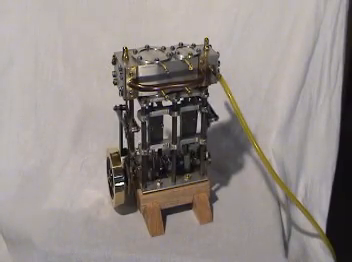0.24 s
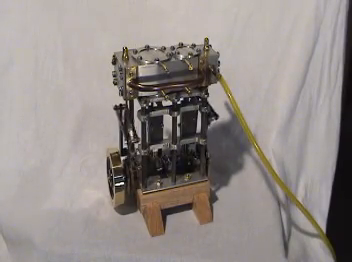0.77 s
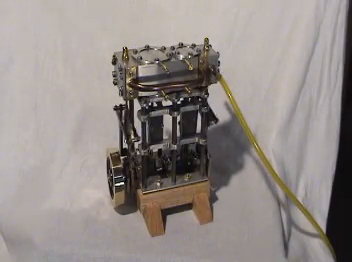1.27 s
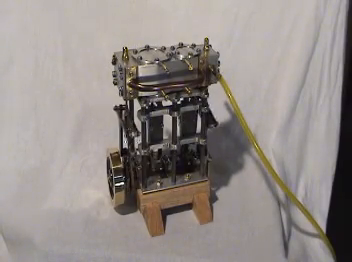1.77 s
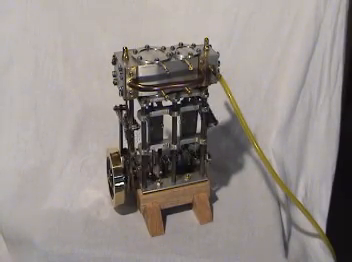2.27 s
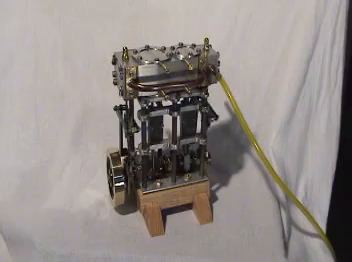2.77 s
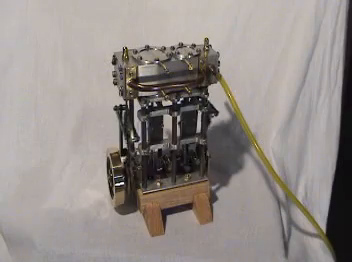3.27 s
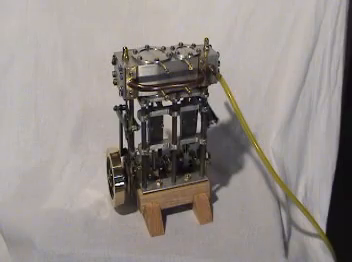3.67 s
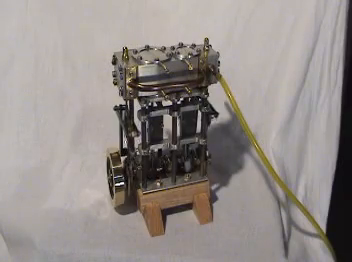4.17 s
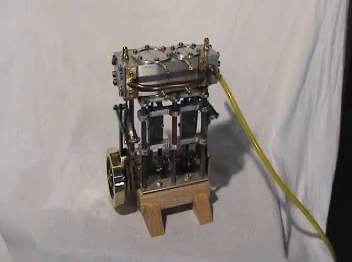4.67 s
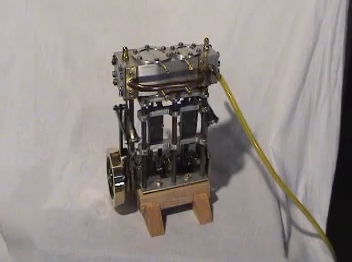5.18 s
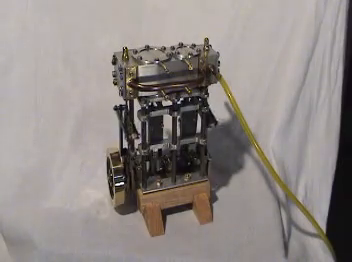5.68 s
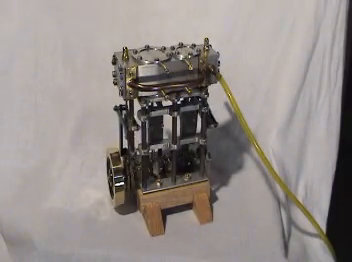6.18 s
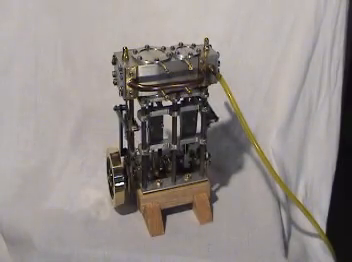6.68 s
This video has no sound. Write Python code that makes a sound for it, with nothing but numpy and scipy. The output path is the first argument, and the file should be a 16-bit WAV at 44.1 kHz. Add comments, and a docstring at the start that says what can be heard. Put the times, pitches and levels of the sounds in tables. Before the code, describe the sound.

Rapid, even mechanical clatter of a tiny twin-cylinder engine on a wooden stand, dry metallic ticks with airy chuffs over faint room hum.

```python
"""A small twin-cylinder model steam engine turns evenly on compressed air, on a wooden plinth on a table. Slack
joints strike brass and steel in the same order every turn, as sums of decaying frame and plinth modes. Rubbing
parts scrape as noise through the frame modes; two exhaust chuffs a turn are noise through port resonances,
gated by the valves. A small room answers with decaying noise tails, over coloured room noise and wavering
sines: a faint motor and mains hum, and a low tone at the thirteenth harmonic of the turning crank."""
import sys
import numpy as np
from scipy import signal
from scipy.fft import rfft, irfft
from scipy.io import wavfile
from scipy.ndimage import uniform_filter1d

SR = 44100
rng = np.random.default_rng(int(sys.argv[2]) if len(sys.argv) > 2 else 0)


def log_audio(samples):
    """Write samples as a 16-bit WAV file to the path given in sys.argv[1]."""
    # one column per channel
    frames = np.atleast_2d(samples).T
    # limit to full scale, then quantise
    limited = np.clip(frames, -1, 1)
    pcm = np.round(limited * 32767).astype(np.int16)
    wavfile.write(sys.argv[1], SR, pcm)


N = 306054
SEC = np.arange(N) / SR


def undb(db):
    """Amplitude ratio of a level in decibels."""
    return 10 ** (np.asarray(db) / 20)


def level(x, db):
    """Normalisation by the root mean square, to a level in dB."""
    return x * undb(db) / np.sqrt(np.mean(x ** 2))


def band(x, hz, width):
    """Second-order resonance with unit gain at its centre."""
    return signal.lfilter(*signal.iirpeak(hz, hz / width, fs=SR), x)


def cut(x, hz, kind, order):
    """Butterworth low-pass or high-pass, maximally flat in its pass band."""
    return signal.sosfilt(signal.butter(order, hz, kind, fs=SR, output="sos"), x)


def ring(hz, t60_ms, db, rise_ms, start_cycles, size, choke=0.98):
    """Modal superposition: sines swell over the contact time and decay; choke over 1 ends them abruptly."""
    ms = np.arange(size)[:, None] * 1000 / SR
    swell = (1 - np.exp(-ms / np.maximum(rise_ms, .02))) ** 2
    fade = np.exp(-np.log(1000) * (ms / t60_ms) ** choke)
    modes = undb(db) * swell * fade * np.sin(2 * np.pi * (hz * ms / 1000 + start_cycles))
    return modes.sum(axis=1)


# The crank passes its mark, the first heavy knock of a turn, at a steady pace.
FIRST_MARK_S, TURN_S, TURN_COUNT = 0.0222, 0.230347, 31
TURN_START_MS = -35  # relative to the mark
# The engine runs a little ahead of or behind that pace.
# Each row: time in seconds, lateness in ms.
PACE_DRIFT = [(0, 0.22), (0.5, 1.23), (1.8, 0.84), (2.2, 0.14), (2.8, -0.034), (3.05, -1.6), (4.15, -1.4),
              (4.4, -0.1), (5.2, -1.1), (6.0, 0.95), (6.9, 0.18)]
STEADY_S = FIRST_MARK_S + TURN_S * np.arange(TURN_COUNT)
MARKS_S = STEADY_S + np.interp(STEADY_S, *np.transpose(PACE_DRIFT)) / 1000


def each_turn(sound, ms, jitter_ms, scatter_db):
    """Near-periodic repetition: one sound at one crank angle, a little uneven in time and strength."""
    pad = SR // 2
    out = np.zeros(N + 2 * pad)
    for mark, (late, hard) in zip(MARKS_S, rng.standard_normal((TURN_COUNT, 2))):
        i = pad + int((mark + (ms + jitter_ms * late) / 1000) * SR)
        out[i:i + len(sound)] += undb(scatter_db * hard) * sound
    return out[pad:pad + N]


def crank_ms():
    """Phase of the rotation, as milliseconds from the mark of the current turn."""
    turn = np.maximum(np.searchsorted(MARKS_S, SEC - TURN_START_MS / 1000) - 1, 0)
    return 1000 * (SEC - MARKS_S[turn])


# Frame modes, one list for each of the six members that a joint can strike.
# Each row: frequency in Hz, 60 dB decay time in ms, relative level in dB.
FRAME_MODES = [
    [(849, 7.03, 0.5), (1808, 19.4, -11.5)],
    [(2274, 9.94, 0), (2748, 6.84, 0.5), (4082, 6.2, -2)],
    [(3205, 6.8, 0.5), (3694, 5.4, 3.5), (10300, 11.5, -12.5)],
    [(1616, 8.45, -5), (4883, 6.04, 2), (8000, 9.7, -8.5), (8790, 12, -14)],
    [(5350, 7.7, 1.5), (6374, 12.7, -4.5), (9460, 6.3, -3.5), (11070, 15, -18)],
    [(1284, 2.55, -17), (5860, 6, 1.5), (6990, 12.4, -2.5), (7580, 11, -4)],
]
# Modes of the plinth and table.
# Each row: frequency in Hz, 60 dB decay time in ms, relative level in dB.
PLINTH_MODES = [(150.5, 220, -14.5), (154, 155, -3.5), (175.5, 100, -7.5), (196.4, 153, -6.5),
                (224.4, 129, -5.5), (265.6, 79, -3), (330, 73, -7.5), (357, 51, -16), (428, 52, -6.5),
                (615, 21, -1.5)]
# Knocks of one turn.
# Each row: time after the mark in ms, rise at 3 kHz in ms, plinth thump in dB, thump centre in Hz,
# then the blow to each of the six members in dB.
KNOCKS = [(-30.5, 0.33, -41.5, 274, -40, -44, -36, -33, -44, -35.5),
          (-22, 0.086, -36, 384, -43, -35, -35.5, -31.5, -29, -36),
          (-18.5, 0.62, -31, 620, -23.5, -35, -57, -27, -39, -42),
          (-13.5, 0.7, -40.5, 360, -34, -31, -51, -41, -47, -49),
          (-0.87, 0.52, -33.5, 250, -26, -16, -16, -15, -36, -30),
          (23, 0.091, -39, 156, -48, -28.5, -49, -24.5, -31, -40),
          (39, 0.33, -32, 133, -40, -27.5, -21, -14, -20.5, -23),
          (65, 0.14, -40.5, 530, -32.5, -39.5, -45, -44, -42, -52),
          (71.5, 0.29, -37, 374, -29, -29.5, -38, -38.5, -34, -53),
          (76.5, 0.067, -39, 190, -58, -43, -40, -35, -33, -31),
          (88.5, 0.44, -34, 248, -24, -15.5, -25, -21, -16.5, -19),
          (122, 0.1, -46, 320, -56, -40.5, -32, -30, -38.5, -24)]
# The cylinder block rings on after each knock, close pairs beating.
# Each row: frequency in Hz, width in Hz, gain in dB.
BLOCK_MODES = [(739, 32, 4), (857, 23, 3), (992, 40, -2), (1033, 28, -2.5), (1422, 27, 8), (1493, 19, 9.5),
               (1613, 12, 3), (1835, 25, 4.5), (2320, 13, -30), (2400, 62, -6), (2807, 55, -5)]
CHATTER_DB = -10  # rms of the noise that multiplies the frame ring


def knocks():
    """Impact excitation: a joint strikes the same spot, so its modes return alike, the low ones swelling later."""
    hz, t60_ms, mode_db = np.concatenate(FRAME_MODES).T
    low_hz, low_t60_ms, low_db = np.transpose(PLINTH_MODES)
    member_sizes = [len(member) for member in FRAME_MODES]
    # the blow spreads through the frame, so the modes start out of step and never pile into one spike
    rank = np.argsort(np.argsort(hz))
    stagger = rank ** 2 / (2 * len(hz)) + rank / 2
    frame = plinth = 0
    for ms, rise_ms, thump_db, thump_hz, *member_db in KNOCKS:
        struck_db = mode_db + np.repeat(member_db, member_sizes)
        mode_rise_ms = rise_ms * (3000 / hz) ** 0.5
        # the oil film closes over the joint and damps the ring
        tick = ring(hz, t60_ms, struck_db, mode_rise_ms, stagger, size=1024, choke=1.46)
        frame = frame + each_turn(tick, ms, jitter_ms=0.12, scatter_db=0.52)
        # the push favours the plinth modes near its centre
        reach_db = -12 * np.log2(low_hz / thump_hz) ** 2
        pushed_db = low_db + thump_db + reach_db
        thump = ring(low_hz, low_t60_ms, pushed_db, rise_ms=0.63, start_cycles=0, size=8192)
        plinth = plinth + each_turn(thump, ms, jitter_ms=0.16, scatter_db=1.46)
    block = sum(undb(db) * band(frame, f, width) for f, width, db in BLOCK_MODES)
    # chatter inside each contact is never the same twice and spreads the ring into a crack
    chatter = level(uniform_filter1d(rng.standard_normal(N), size=8), CHATTER_DB)
    crack = cut(frame * chatter, 1100, "high", order=2)
    return frame + block + crack, cut(plinth, 132, "high", order=2)


# Rods and slides rubbing over one turn.
# Each row: time after the mark in ms, level in dB.
RUB_LEVELS = [(-36, -49), (-24.5, -37), (3, -43.5), (25, -37.5), (58, -39.5), (101.5, -37), (110, -56),
              (140, -50), (195, -54.5)]


def rubbing():
    """Friction excitation: repeating worn spots and fresh grit ring the frame, its lower modes most."""
    worn_spots = rng.standard_normal(int(TURN_S * SR)) ** 3
    worn = each_turn(worn_spots, TURN_START_MS, jitter_ms=0.1, scatter_db=3.0)
    scrape = level(worn, 0) + undb(-6) * rng.standard_normal(N)
    frame_hz = np.concatenate(FRAME_MODES)[:, 0]
    # the weight falls 3.5 dB per kHz
    body = sum(undb(-3.5 * hz / 1000) * band(scrape, hz, 630) for hz in frame_hz)
    return level(body, 0) * undb(np.interp(crank_ms(), *np.transpose(RUB_LEVELS)))


# Exhaust puffs of one turn.
# Each row: valve opening after the mark in ms, shutting after the mark in ms, level in dB, swell in ms,
# blow-down in dB per ms.
EXHAUST_PUFFS = [(-17, 29, -23.5, 8.9, 0.36), (93.5, 145, -28.5, 1.4, 0.76)]
# Air leaks past the valves after the first puff opens and thins out round the turn; level at the mark.
LEAK_DB, LEAK_DB_PER_MS, VALVE_SHUT_MS = -41, 0.1, 1.6


def valve_flow():
    """Pressure blow-down: a puff swells as its valve opens, decays and is shut off; a leak fills the pauses."""
    ms = crank_ms()
    first_opens = EXHAUST_PUFFS[0][0]
    # before the first puff, the leak still thins out from the turn before
    leak_ms = np.where(ms > first_opens, ms, ms + 1000 * TURN_S)
    flow = undb(LEAK_DB - LEAK_DB_PER_MS * leak_ms)
    for opens, shuts, db, swell_ms, db_per_ms in EXHAUST_PUFFS:
        since = np.maximum(ms - opens, 0)
        swell = 1 - np.exp(-since / swell_ms)
        shut = np.exp(-np.maximum(ms - shuts, 0) / VALVE_SHUT_MS)
        flow = flow + swell * undb(db - db_per_ms * since) * shut
    return flow


# Resonances of the exhaust ports.
# Each row: frequency in Hz, width in Hz, relative level in dB.
PORT_RESONANCES = [(2960, 600, -8.5), (4930, 1250, -19), (5400, 330, -13), (6357, 166, 2), (6970, 370, -2),
                   (7600, 230, -2), (8013, 196, 1), (8830, 430, -16), (10260, 1300, -19),
                   (11140, 920, -13.5)]


def exhaust():
    """Turbulent jet noise: air whistles through the port resonances as the slide valves open."""
    turbulence = rng.standard_normal(N)
    slow_noise = level(uniform_filter1d(rng.standard_normal(N), size=120), 0)
    flutter = undb(1.75 * slow_noise)  # 1.75 dB rms
    jet = 0
    for k, (hz, width, db) in enumerate(PORT_RESONANCES):
        # neighbouring resonances alternate in sign
        jet = jet + (-1) ** k * undb(db) * band(turbulence, hz, width)
    return level(jet, 0) * flutter * valve_flow()


# Coloured room noise, interpolated over log frequency.
# Each row: frequency in Hz, relative density in dB per Hz.
NOISE_SPECTRUM = [(35, -30), (59, -30), (100, -10), (125, -1.5), (391, -4.5), (1560, -15), (2130, -12.5),
                  (2850, -5.5), (3160, -9.5), (3430, -9.5), (3730, -19.5), (6380, -15.5), (9070, -43),
                  (12400, -28), (14000, -62)]
# Steady hum about which the level wavers.
# Each row: frequency in Hz, rms level in dB.
HUM_TONES = [(56.5, -59), (58.8, -73), (118, -55), (120, -74), (157.6, -57), (169.5, -59), (235.4, -64),
             (294.8, -64.5), (353.9, -55.5)]
AIR_DB = -46  # rms of the coloured noise pair, before its side part is lowered


def room_tone():
    """Stationary shaped noise, and a sum of hum sines whose levels waver slowly."""
    hz = np.maximum(np.fft.rfftfreq(N, 1 / SR), 1)
    point_hz, point_db = np.transpose(NOISE_SPECTRUM)
    shape = undb(np.interp(np.log(hz), np.log(point_hz), point_db))
    air = level(irfft(rfft(rng.standard_normal((2, N))) * shape, N), AIR_DB)
    for f, db in HUM_TONES:
        # three random levels a second, joined by straight lines
        waver_db = 1.3 * np.interp(SEC * 3.0, np.arange(64), rng.standard_normal(64))
        tone = np.sin(2 * np.pi * (f * SEC + rng.random()))
        air[0] += np.sqrt(2) * undb(db + waver_db) * tone
    return air[0], undb(-5.5) * air[1]


ROOM_T60_S, ROOM_DB, ROOM_HZ = 0.29, -14, 2650  # decay time, energy of each tail, low-pass cutoff


def room(x):
    """Diffuse reverberation: two unrelated decaying noise tails, duller than the direct sound."""
    t = SEC[:SR // 2]
    onset = np.clip(t / 0.0097, 0, 1)
    tails = rng.standard_normal((2, len(t))) * undb(-60 * t / ROOM_T60_S) * onset
    tails = cut(tails, ROOM_HZ, "low", order=1)
    tails = undb(ROOM_DB) * tails / np.sqrt((tails ** 2).sum(axis=1, keepdims=True))
    return signal.fftconvolve(x[None], tails, axes=1)[:, :N]


# Reflection from the table top, then a delayed copy, opposite in the two channels, which widens the treble.
# Each row: delay in ms, level in dB (the second row's before its slope is taken).
DELAYED_COPIES = [(1.7, -28), (9, -21)]
RIGHT_SHARE, SIDE_DB = 0.12, -17.5  # lean to the right; gain of the engine's slope in the side signal


def scene():
    """Mid-side stereophony: engine, reflection and room as middle and side of a close microphone pair."""
    frame, plinth = knocks()
    engine = frame + rubbing() + exhaust()
    table, widener = (undb(db) * np.roll(engine, int(ms * SR / 1000)) for ms, db in DELAYED_COPIES)
    wet = room(engine)
    air, air_side = room_tone()
    mid = engine + table + plinth + wet[0] + air
    # the slope makes the side signal grow with pitch, so the engine's treble sounds wider than its bass
    side = undb(SIDE_DB) * np.gradient(engine - table) + np.gradient(widener)
    side = side + undb(-8.5) * cut(wet[1], 230, "high", order=1) + air_side
    # the engine stands a little to the right; its thump leans left through the table
    side = side - RIGHT_SHARE * cut(engine + table, 7100, "low", order=1)
    side = side + 0.013 * (plinth + air)
    return np.array([mid + side, mid - side])


TOP_HZ = 14300


def record(dry):
    """Band limitation: the microphone falls off in deep bass and above the presence range; the top is cut."""
    no_rumble = cut(dry, 30, "high", order=2)
    soft = cut(no_rumble, 10540, "low", order=4)
    # steep elliptic low-pass: 0.2 dB ripple, 70 dB rejection
    return signal.sosfilt(signal.ellip(8, 0.2, 70, TOP_HZ, fs=SR, output="sos"), soft)


dry = scene()
out = record(dry)
log_audio(out)
```